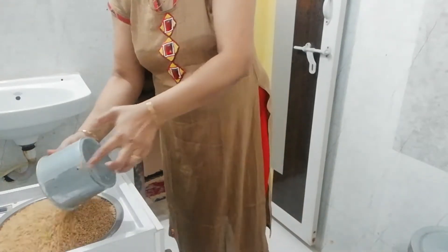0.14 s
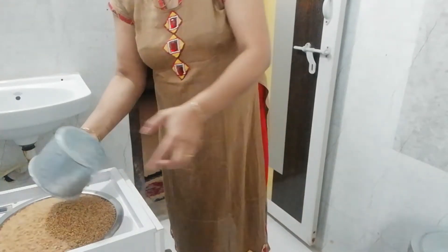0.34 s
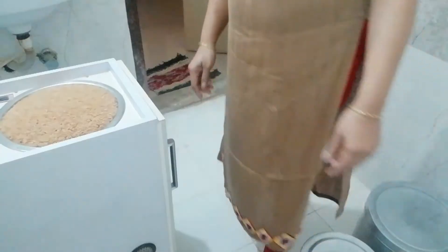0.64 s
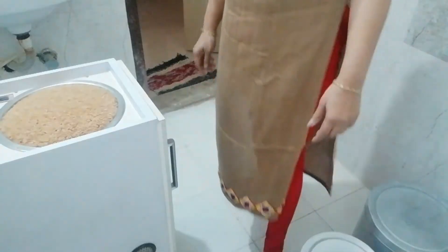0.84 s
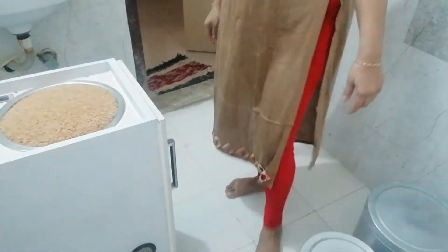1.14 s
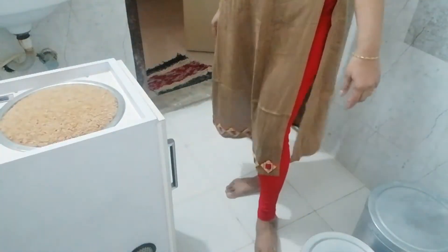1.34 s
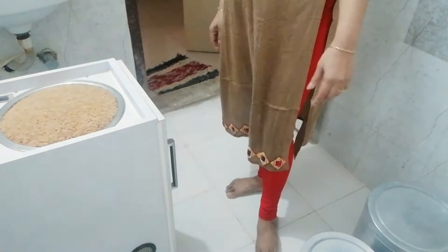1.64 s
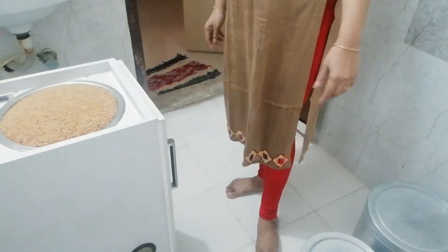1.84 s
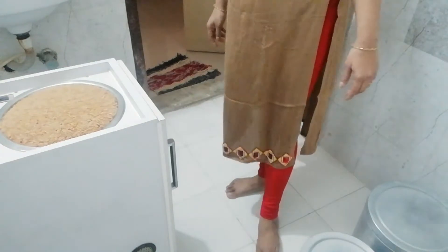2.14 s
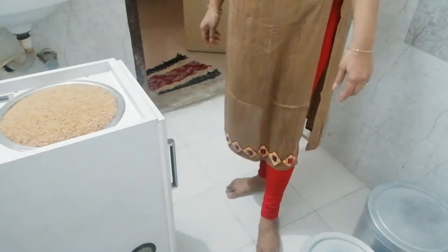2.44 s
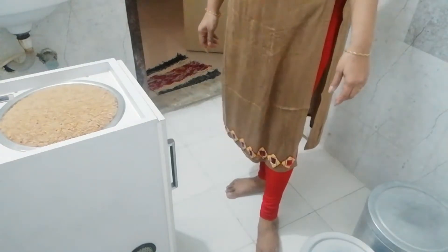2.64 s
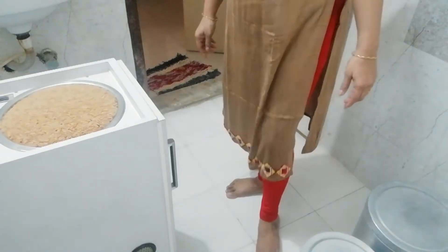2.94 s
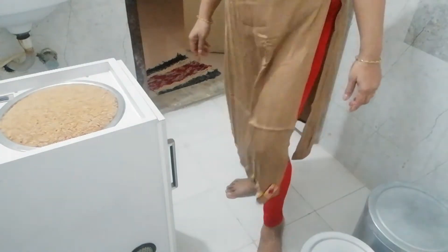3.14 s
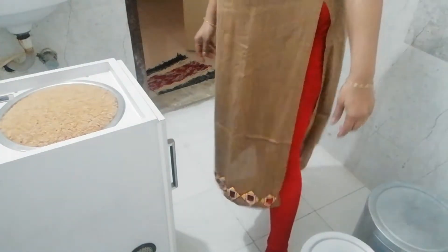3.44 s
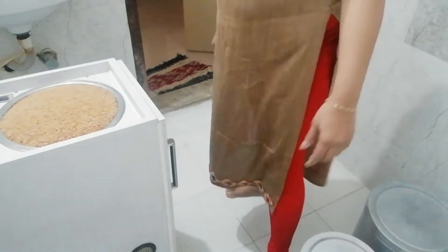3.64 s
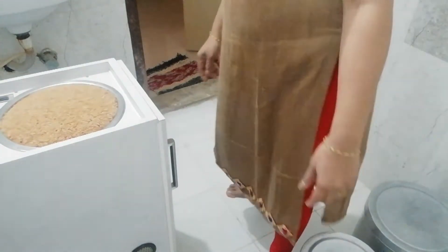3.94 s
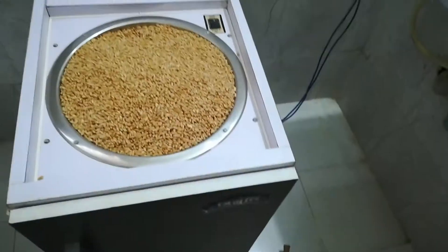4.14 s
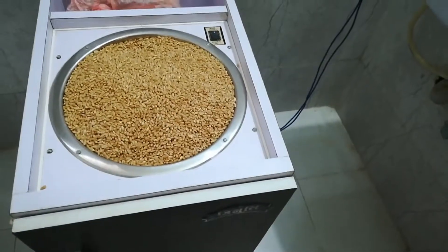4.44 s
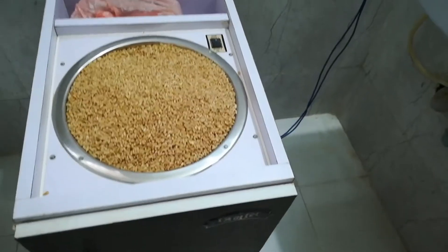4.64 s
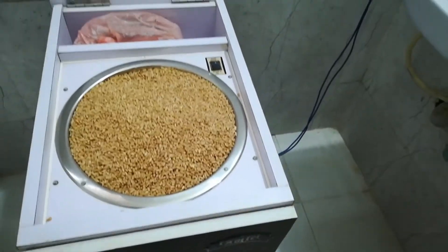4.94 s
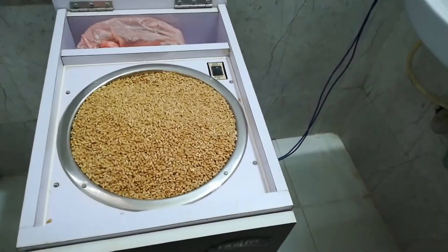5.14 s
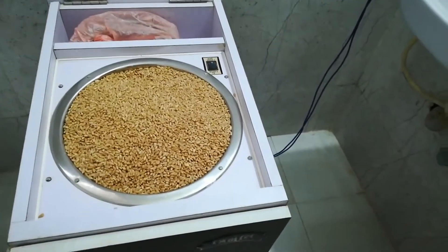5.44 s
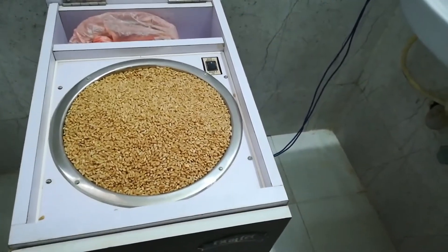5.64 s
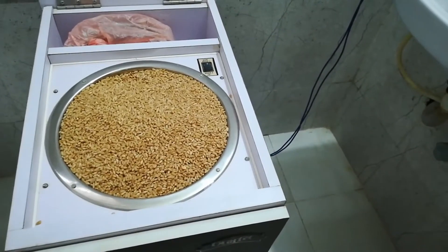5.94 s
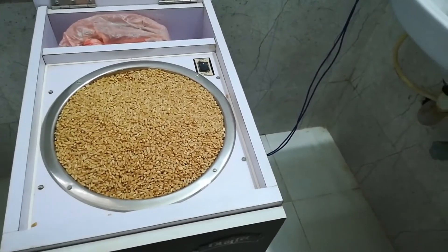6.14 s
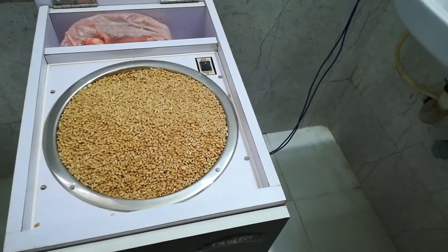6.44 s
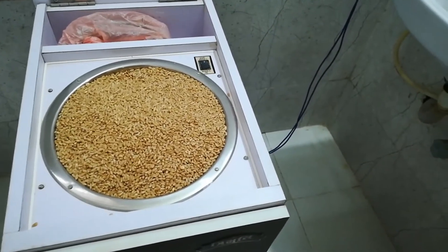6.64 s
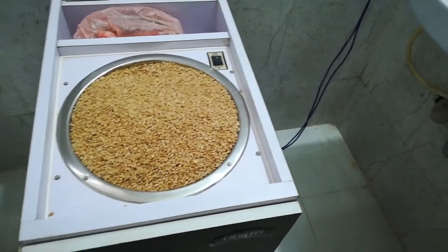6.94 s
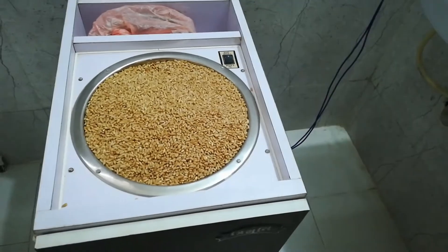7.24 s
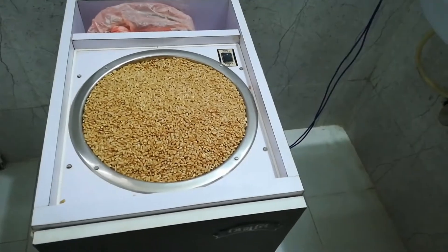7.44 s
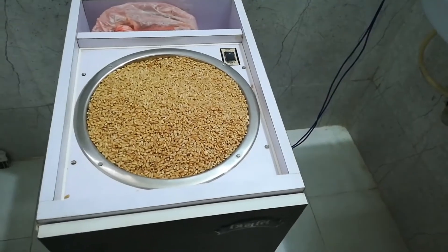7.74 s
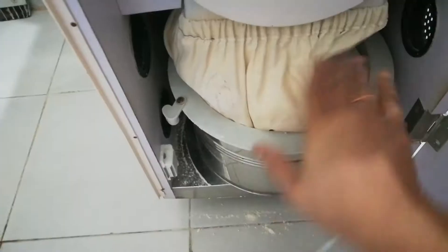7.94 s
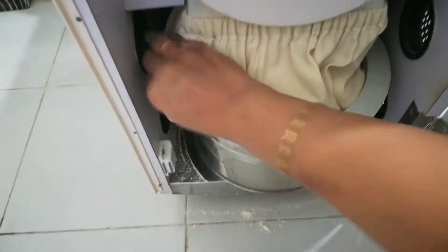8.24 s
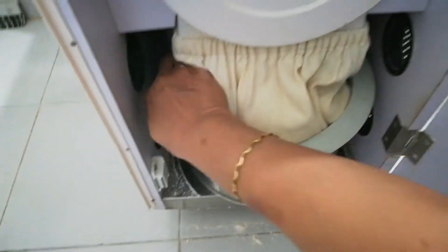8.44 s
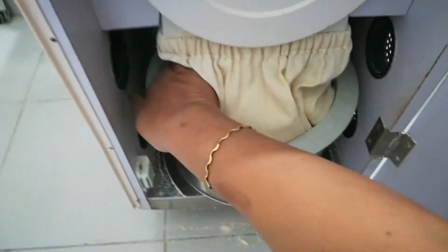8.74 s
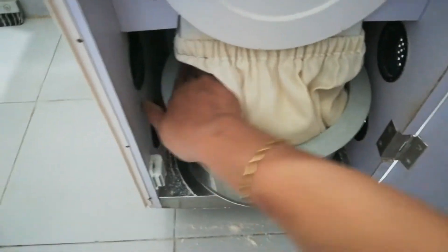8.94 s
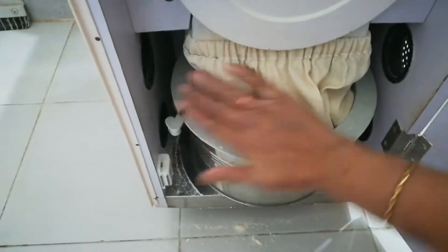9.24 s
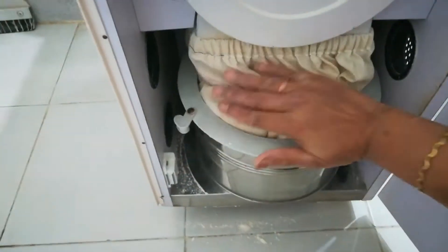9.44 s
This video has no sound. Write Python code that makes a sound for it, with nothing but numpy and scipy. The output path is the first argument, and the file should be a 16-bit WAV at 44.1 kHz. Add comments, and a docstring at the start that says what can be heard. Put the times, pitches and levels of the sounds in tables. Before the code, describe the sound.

Wheat patters briefly into a hopper, then an electric flour mill hums, whines and crackles loudly, cuts off, and cloth rustles amid metal knocks.

```python
"""A small tiled washroom with a home flour mill, in four abruptly joined moments.
The last wheat patters into the hopper as random tiny impacts. The mill runs, heard from the front and then
from above: six beaters hum and the motor whines as wavering tones, grain shatters as clumped impacts.
After a short silence, the motor off, a hand fits the cloth bag on the steel flour bin: strokes of noise
rub and swish, and knocks ring the steel."""
import sys
import numpy as np
from scipy import signal
from scipy.fft import rfft, irfft, next_fast_len
from scipy.io import wavfile

SR = 44100
rng = np.random.default_rng(int(sys.argv[2]) if len(sys.argv) > 2 else 0)


def store_wav(level_fs):
    """Save 16-bit WAV to argv[1]."""
    pcm = np.round(np.clip(np.atleast_2d(level_fs), -1, 1) * 32767)
    wavfile.write(sys.argv[1], SR, pcm.T.astype(np.int16))


N = 422919

MAGNETIC_HZ, BEATER_COUNT, SLOT_COUNT = 100.12, 6, 18  # magnetic pull at twice the mains frequency
ROOM_T60_S = 0.51
AIR_DB = -59


# the running mill from the front, before trim: (time [s], beater hum level [dB], grinding level [dB])
FRONT_RUN = [(0.55, -26.5, -24.5), (1.04, -25, -24), (2.0, -23, -24.5), (2.95, -23, -25), (3.6, -24.5, -25),
             (4.02, -25.6, -24)]
# motor whine from the front, before trim: (time [s], level [dB])
FRONT_WHINE = [(0.6, -38), (1.05, -33.5), (1.6, -36.5), (1.76, -34), (2.05, -32), (2.32, -36.5),
               (2.7, -32.5), (3.3, -34), (4.02, -33.5)]
# beating of the whine: (time of a trough [s], depth [0-1])
FRONT_BEAT = (0.99, 0.11)
# tones: (shaft order, magnetic sideband, level [dB], left-right [dB], unsteadiness [0-1])
FRONT_TONES = [(0, 1, -53, 0, .5), (0, 2, -40, 1, .25), (0, 3, -45, 3, .3), (7, 0, -52, 3, .5),
               (12, 0, -54, -4, .3), (18, -1, -53, 4, .5), (18, 0, -46, 4, .5), (19, 0, -48, 6, .6),
               (20, 1, -47, 9, .5), (24, 0, -39, 12, .4), (35, -1, -45, 8, .6), (36, -1, -46, 4, .7),
               (34.5, 0, -47, 10, .7), (36, 0, -47, 12, .8)]
# cabinet and room resonances: (frequency [Hz], width [Hz], relative level [dB], left-right [dB])
FRONT_CABINET = [(30, 16, -66, -4), (100, 18, -51.5, -1), (116.9, 4, -46, 0.5), (143.4, 5.9, -48.5, 5),
                 (190.4, 32, -44.5, -4), (250, 50, -53.5, 1), (299.6, 25, -43, -1), (487, 22, -50, 21),
                 (860, 52, -41.5, 4), (960, 15, -43, -2.5), (1279, 29, -38, 5.5)]
# shattering grain: (frequency [Hz], relative level [dB per Hz])
FRONT_COLOUR = [(200, -33), (400, -18), (720, -10.5), (1050, -4), (1400, -5), (1700, -3), (2500, -9.5),
                (3200, -8), (5400, -4.5), (6900, 1.5), (7800, -3.5), (9300, -11), (10500, -18.5),
                (12000, -22.5), (15000, -28.5)]
# its stereo balance: (frequency [Hz], left-right [dB])
FRONT_BALANCE = [(300, -8), (600, 3), (1700, 6), (3000, 4.5), (7000, 10), (14000, 5.5)]


def mill_front(t):
    """Before the cabinet the motor is strong and the grain is muffled."""
    turns = shaft(t)
    hum_db, grind_db = in_time(t, FRONT_RUN)
    whine_db, = in_time(t, FRONT_WHINE)
    out = cabinet(t, FRONT_CABINET)
    out += overtones(t, turns, FRONT_TONES, lag_s=-0.000077, waver_rate=5.4)
    out += from_db(hum_db + 2.2) * hum(t, turns, balance_db=.8, flutter=0.037, lead_rad=1.28)
    motor = whine(t, turns, FRONT_BEAT, unsteady=0.14, balance_db=44.5, lead_rad=0.29)
    out += from_db(whine_db + 4.5) * motor
    grain = grinding(t, turns, FRONT_COLOUR, FRONT_BALANCE, lag_s=-.0006,
                     feed_db=1.94, beat_db=1.0, direct_db=-5.5, rush_db=-2.5)
    return out + from_db(grind_db - 0.13) * grain


# the running mill from above, before trim: (time [s], beater hum level [dB], grinding level [dB])
ABOVE_RUN = [(4.06, -26.5, -20.5), (4.16, -28, -20), (4.3, -27, -21.5), (4.8, -26.5, -20),
             (5.75, -25.5, -21.5), (6.7, -26, -21), (6.84, -25, -20), (6.98, -27.5, -22), (7.1, -27, -21),
             (7.85, -26, -20)]
# beating of the whine: (time of a trough [s], depth [0-1])
ABOVE_BEAT = (4.70, 0.74)
# tones: (shaft order, magnetic sideband, level [dB], left-right [dB], unsteadiness [0-1])
ABOVE_TONES = [(5, 0, -48, 1, .5), (5.5, 0, -44.5, 2, .7), (7, 0, -47, -7, .4), (12, 0, -52, -4, .3),
               (18, -1, -55, -7, .5), (20, 1, -51, -5, .6), (25, 1, -47, -2, .5), (22, 0, -52, -4, .5),
               (73, 0, -44, -6, .8)]
# two beater overtones, before the swell: (shaft order, magnetic sideband, level [dB],
# left-right [dB], unsteadiness [0-1])
SWELLING_TONES = [(18, 0, -41, -4, .4), (24, 0, -44, -6, .4)]
# their swell late in the run: (time [s], gain [dB])
SWELL = [(4.1, -4), (6.55, -11), (6.9, 3), (7.85, 1.5)]
# cabinet and room resonances: (frequency [Hz], width [Hz], relative level [dB], left-right [dB])
ABOVE_CABINET = [(27, 14, -73, 1), (76.3, 6, -68, 5), (100, 12, -54.5, 0), (137.8, 5.7, -50.5, 3),
                 (223, 26, -47.5, -3), (314, 26, -42.5, -3), (863, 18, -46.5, -4.5), (940, 14, -44.5, -14),
                 (1140, 49, -44.5, 5.5), (1285, 23, -42.5, -5)]
# shattering grain: (frequency [Hz], relative level [dB per Hz])
ABOVE_COLOUR = [(200, -33.5), (400, -20.5), (720, -20.5), (1050, -15), (1420, -15), (1600, -12),
                (2600, -14), (3500, -10), (5100, -12), (5900, -2), (6900, 1), (8300, -6), (9400, -5.5),
                (10700, -20.5), (13000, -20), (15000, -34)]
# its stereo balance: (frequency [Hz], left-right [dB])
ABOVE_BALANCE = [(300, -6), (600, -4.5), (1300, -4), (2000, -6), (4000, -8), (7000, -17), (14000, -16.5)]
ABOVE_WHINE_DB = -32


def mill_above(t):
    """Over the hopper the hiss of the grain comes straight up."""
    turns = shaft(t)
    hum_db, grind_db = in_time(t, ABOVE_RUN)
    swell_db, = in_time(t, SWELL)
    out = cabinet(t, ABOVE_CABINET)
    out += overtones(t, turns, ABOVE_TONES, lag_s=0.00054, waver_rate=5.5)
    out += from_db(swell_db) * overtones(t, turns, SWELLING_TONES, lag_s=0.00038, waver_rate=4.9)
    out += panel(t, hz=260.2, level_db=-39, unsteady=.5)
    out += bump(t, level_db=-26, t60=0.067)
    out += from_db(hum_db + 0.5) * hum(t, turns, balance_db=-2.0, flutter=0.11, lead_rad=-0.82)
    motor = whine(t, turns, ABOVE_BEAT, unsteady=0.12, balance_db=-5.0, lead_rad=1.76)
    out += from_db(ABOVE_WHINE_DB) * motor
    grain = grinding(t, turns, ABOVE_COLOUR, ABOVE_BALANCE, lag_s=.00059,
                     feed_db=2.0, beat_db=2.5, direct_db=-8.0, rush_db=0.0)
    return out + from_db(grind_db + 0.62) * grain


# beaters passing under load: (time [s], rate [passes per s])
BEATERS = [(0.5, 291.7), (1.2, 290.9), (2.1, 290.7), (3.2, 291.05), (4.05, 291.0), (4.06, 287.9),
           (5.1, 287.5), (6.0, 288.5), (6.4, 288.75), (7.0, 287.75), (7.85, 287.3)]


def shaft(t):
    """Turns made by the shaft that drives hum, whine and grinding."""
    passes_per_s, = in_time(t, BEATERS)
    return np.cumsum(passes_per_s) / BEATER_COUNT / SR


def grinding(t, turns, colour, balance, lag_s, feed_db, beat_db, direct_db, rush_db):
    """Kernels shatter in clumps, hardest as a beater passes, over the rush of swirling flour."""
    clumps_db = feed_db * (0.65 * drift(t, 9.7) + 0.87 * drift(t, 90))
    beaters_db = beat_db * np.cos(2 * np.pi * turns * BEATER_COUNT)
    impacts = grains(t, per_s=9000, spread_db=3.0) * from_db(clumps_db + beaters_db)
    rush = from_db(rush_db) * rng.standard_normal((2, len(t)))
    sound = washroom(impacts, direct_db, lag_s) + rush
    return coloured(sound, colour, 2000, 14000, over_hz(freqs(len(t)), balance))


def hum(t, turns, balance_db, flutter, lead_rad):
    """The beaters pump air six times a turn."""
    return tone(t, BEATER_COUNT * turns, flutter, 12, lead_rad, balance_db)


def whine(t, turns, beat, unsteady, balance_db, lead_rad):
    """The rotor slots pass the magnetic pull of the mains; the whine swells at twice the rotor's slip."""
    trough_s, depth = beat
    slip = MAGNETIC_HZ * t - 2 * turns  # cycles
    since_trough = slip - np.interp(trough_s, t, slip)
    swell = np.abs(1 - depth * np.exp(2j * np.pi * since_trough)) / np.hypot(1, depth)
    cycles = SLOT_COUNT * turns + MAGNETIC_HZ * t
    return swell * tone(t, cycles, unsteady, 8.8, lead_rad, balance_db)


def overtones(t, turns, tones, lag_s, waver_rate):
    """Weaker shaft orders and magnetic sidebands, each swelling and fading."""
    out = 0
    for order, sideband, level_db, balance_db, unsteady in tones:
        cycles = order * turns + sideband * MAGNETIC_HZ * t
        hz = (cycles[1] - cycles[0]) * SR
        lead_rad = -2 * np.pi * hz * lag_s
        out = out + from_db(level_db) * tone(t, cycles, unsteady, waver_rate, lead_rad, balance_db)
    return out


def cabinet(t, modes):
    """Air and tumbling grain shake the panels: noise through their resonances."""
    power = sum((from_db(db) * pan(balance_db) * resonance(t, hz, width)) ** 2
                for hz, width, db, balance_db in modes)
    return shaped(diffuse(t), np.sqrt(power))


def panel(t, hz, level_db, unsteady):
    """A panel drones just under the hum, a slowly wavering tone."""
    return from_db(level_db) * tone(t, hz * t, unsteady, waver_rate=2.5, lead_rad=-.4, balance_db=2)


def bump(t, level_db, t60):
    """A brief low bump of dying noise as the sound jumps to the new place."""
    colour = [(15, -25), (40, -15), (120, -5), (350, -3), (800, -25.5), (3000, -70)]
    fading_db = level_db - 60 * (t - t[0]) / t60
    return from_db(fading_db) * coloured(diffuse(t), colour, 18, 400)


# wheat poured on wheat: (time [s], level [dB])
POUR = [(0.0, -31), (0.21, -34.5), (0.412, -53.5), (0.5, -66)]
# its colour: (frequency [Hz], relative level [dB per Hz])
POUR_COLOUR = [(200, -48), (400, -34), (800, -31), (1500, -27.5), (2400, -26), (3300, -22.5), (4050, -9.5),
               (4550, -9), (5200, -17), (6000, -3), (6600, -4), (8000, -7.5), (10000, -19), (15000, -29)]


def pouring(t):
    """Kernels patter on the heap as tiny impacts and fade out, in the quiet room."""
    level_db, = in_time(t, POUR)
    impacts = washroom(grains(t, per_s=2200, spread_db=3.5), direct_db=-12, lag_s=0.001)
    patter = coloured(impacts, POUR_COLOUR, 1000, 14000, balance_db=3.0)
    return from_db(level_db) * patter + air(t, level_db=AIR_DB)


def bag(t):
    """The bag is fitted on the bin: cloth, pushes, singing rim and knocks in the quiet room."""
    return cloth(t) + pushes(t) + rim(t) + knocks(t) + air(t, level_db=AIR_DB - 8.0)


# knocks on the bin: (time [s], thud level [dB], clank level [dB], tick level [dB])
KNOCKS = [(7.953, -58, -72, -52), (8.036, -48.5, -73, -60), (8.068, -57, -77, -53), (8.288, -68, -65, -57),
          (8.410, -50, -61, -53), (8.483, -46, -63, -56), (8.511, -39.5, -43, -37.5),
          (8.535, -41.5, -45.5, -58), (8.664, -55, -51.5, -54), (8.772, -44, -60, -62),
          (8.814, -63, -75, -55), (8.989, -58, -74, -36.5), (9.167, -50, -68, -36.5),
          (9.392, -41, -68, -39), (9.427, -58, -75, -45)]
# low ringing of bin and cabinet: (frequency [Hz], width [Hz], relative level [dB])
THUD_MODES = [(170, 23, -2), (218, 25, -1), (290, 100, -5.5)]
# ringing of the steel: (frequency [Hz], width [Hz], relative level [dB])
CLANK_MODES = [(563, 45, -1.5), (650, 64, -1), (940, 110, -3), (1351, 100, -13), (1600, 90, -5),
               (1860, 120, -2)]


def knocks(t):
    """The bin thuds against the cabinet, its steel clanks, the clamp ticks."""
    _, thud_db, clank_db, tick_db = np.transpose(KNOCKS)
    thud = blows(t, thud_db, t60=0.42, rise_s=0.0019) * ringing(t, THUD_MODES)
    clank = blows(t, clank_db, t60=0.36, rise_s=0.0019) * ringing(t, CLANK_MODES)
    crack_colour = [(300, -11), (1400, 3), (2800, 0.5), (5000, 5), (7500, 3.5), (15000, -43)]
    crack = coloured(diffuse(t), crack_colour, 300, 15000, balance_db=-3)
    tick = blows(t, tick_db, t60=0.019, rise_s=.0005)
    tick_tail = blows(t, tick_db - 16.0, t60=ROOM_T60_S, rise_s=.004)
    return thud + clank + (tick + tick_tail) * crack


def blows(t, levels_db, t60, rise_s):
    """The envelope of all knocks: each rises quickly and dies away."""
    age = np.maximum(t - np.array(KNOCKS)[:, :1], 0).astype(np.float32)
    each = np.exp(-np.log(1000) * age / t60) * (1 - np.exp(-age / rise_s))
    return np.sqrt(from_db(2 * levels_db) @ each ** 2)


# strokes over the cloth bag: (time [s], length [s], swish level before trim [dB], rub level [dB])
STROKES = [(7.948, .05, -49.5, -63), (7.997, 0.056, -46, -61), (8.29, 0.13, -64, -70),
           (8.392, 0.12, -54, -63), (8.495, 0.059, -48, -57), (8.60, .16, -57, -61.5),
           (8.79, 0.1, -62, -67), (8.883, .07, -57, -66), (8.993, 0.18, -54, -63), (9.167, 0.066, -45, -62),
           (9.283, 0.04, -56, -66), (9.373, 0.066, -46, -55.5), (9.464, .035, -52.5, -59.5),
           (9.528, .02, -53, -65)]
# catching fibres: (frequency [Hz], relative level [dB per Hz])
SWISH_COLOUR = [(1250, -31.8), (2500, -8), (4500, -5), (5700, -5), (7000, 2.5), (9000, -11.1),
                (11000, -20.1), (15000, -27)]
# rubbing on the bin: (frequency [Hz], relative level [dB per Hz])
RUB_COLOUR = [(120, -27), (250, 5), (400, 0.5), (600, -12.5), (1100, -2), (1600, -1.5), (2400, -7),
              (4000, -23)]
STROKE_ATTACK_S, STROKE_RELEASE_DB_PER_S = 0.017, 220


def cloth(t):
    """Fibres catch and slip as tiny impacts, and the bag rubs the rim as smooth noise."""
    start_s, length_s, swish_db, rub_db = np.transpose(STROKES)
    swishing, rubbing = (strokes(t, start_s, length_s, db, STROKE_ATTACK_S, STROKE_RELEASE_DB_PER_S)
                         for db in (swish_db, rub_db))
    fibres = washroom(grains(t, per_s=3500, spread_db=7.5), direct_db=-11, lag_s=.0006)
    swish = swishing * from_db(-1.0) * coloured(fibres, SWISH_COLOUR, 3000, 14000, balance_db=-6)
    rub = rubbing * coloured(diffuse(t), RUB_COLOUR, 900, 2500, balance_db=-0.5)
    return swish + rub


# the steel rim under the sliding hand: (time [s], level [dB])
RIM = [(8.27, -94), (8.29, -62), (8.40, -65), (8.52, -54), (8.62, -67), (8.67, -64), (8.80, -78),
       (8.9, -95)]
# its modes: (frequency [Hz], width [Hz], relative level [dB])
RIM_MODES = [(1500, 60, 0), (1640, 70, -0.5), (1800, 70, -7)]


def rim(t):
    """The steel rim sings under the sliding hand."""
    level_db, = in_time(t, RIM)
    return from_db(level_db) * ringing(t, RIM_MODES)


# pushes that set the cabinet booming: (time [s], length [s], level [dB])
PUSHES = [(7.953, .09, -55), (8.51, 0.18, -54), (8.74, .11, -62), (9.357, .08, -50)]
# low handling rumble: (time [s], level [dB])
RUMBLE = [(7.96, -62), (8.1, -73), (8.3, -65), (8.75, -65), (8.88, -74), (9.0, -61), (9.2, -67),
          (9.33, -54), (9.4, -51), (9.58, -55)]
# its colour: (frequency [Hz], relative level [dB per Hz])
RUMBLE_COLOUR = [(10, -5), (25, 3), (50, -3), (110, -11), (200, -33), (600, -80)]
BOOM_HZ, PUSH_ATTACK_S, PUSH_RELEASE_DB_PER_S = 74.5, 0.019, 110


def pushes(t):
    """The cabinet booms on one wavering tone and rumbles as it is pushed."""
    pushing = strokes(t, *np.transpose(PUSHES), PUSH_ATTACK_S, PUSH_RELEASE_DB_PER_S)
    boom = pushing * tone(t, BOOM_HZ * t, unsteady=0.28, waver_rate=12, lead_rad=0, balance_db=1)
    rumble_db, = in_time(t, RUMBLE)
    return boom + from_db(rumble_db) * coloured(diffuse(t), RUMBLE_COLOUR, 18, 53)


def strokes(t, start_s, length_s, levels_db, attack_s, release_db_per_s):
    """The envelope of sustained gestures: each rises, holds for its length and fades."""
    age = t - start_s[:, None]
    overtime = np.maximum(age - length_s[:, None], 0)
    fading_db = levels_db[:, None] - release_db_per_s * overtime
    each = np.clip(age / attack_s, 0, 1) * from_db(fading_db)
    return each.max(0)


# the quiet room: (frequency [Hz], relative level [dB per Hz])
AIR_COLOUR = [(15, -32), (25, -7), (163, -8), (501, -22), (2070, -16), (3730, -14.5), (5280, -15),
              (6540, -15), (7480, -17), (15000, -37)]


def air(t, level_db):
    """The quiet room, a steady coloured noise."""
    return from_db(level_db) * coloured(diffuse(t), AIR_COLOUR, 33, 15000)


def washroom(x, direct_db, lag_s):
    """Direct sound, later at the left by lag, plus the dense tail of the tiles."""
    age = np.arange(SR // 2) / SR
    tail = from_db(-60 * age / ROOM_T60_S) * (age > .002)
    response = rng.standard_normal((2, len(age))) * tail
    response /= np.sqrt(np.sum(response ** 2, axis=1, keepdims=True))
    for ear, late_s in enumerate((max(lag_s, 0), max(-lag_s, 0))):
        response[ear, round(late_s * SR)] += from_db(direct_db)
    return rms_one(shaped(x, rfft(response, len(x))))


def grains(t, per_s, spread_db):
    """Random tiny impacts, a few much harder than the rest."""
    hardness = from_db(spread_db * np.minimum(rng.exponential(1, len(t)), 4))
    return (rng.random(len(t)) < per_s / SR) * hardness * rng.choice([-1, 1], len(t))


def tone(t, cycles, unsteady, waver_rate, lead_rad, balance_db):
    """A line of rms 1 that wavers in strength and phase; the left side leads."""
    share = np.clip(unsteady, 0, 1)
    lead = np.array([[lead_rad], [0]])
    phase = (2 * np.pi * ((cycles + rng.random()) % 1) + lead).astype(np.float32)
    steady = np.sqrt(2 - 2 * share ** 2)
    in_phase = (steady + share * drift(t, waver_rate)) * np.sin(phase)
    quadrature = share * drift(t, waver_rate) * np.cos(phase)
    return pan(balance_db) * (in_phase + quadrature)


def ringing(t, modes):
    """Clusters of close modes; rms 1."""
    power = sum((from_db(db) * resonance(t, hz, width)) ** 2 for hz, width, db in modes)
    return rms_one(shaped(diffuse(t), np.sqrt(power)))


def resonance(t, hz, width_hz):
    """A steep-sided peak that passes unit power of white noise."""
    f = freqs(len(t))
    return rms_one(f / (f + hz) / (1 + ((f - hz) / width_hz) ** 2))


def diffuse(t, alike_below_hz=430):
    """Room noise: nearly the same at both ears in the bass, unrelated in the treble."""
    mid, side = rng.standard_normal((2, len(t)))
    alike = .97 / (1 + (freqs(len(t)) / alike_below_hz) ** 3)
    return shaped(mid, np.sqrt(1 + alike)) + shaped(side, np.sqrt(1 - alike)) * [[1], [-1]]


def coloured(x, colour, lo_hz, hi_hz, balance_db=0):
    """Give a stereo sound its colour; the centre has rms 1 between lo and hi."""
    hz = freqs(x.shape[1])
    spectrum = rfft(x) * from_db(over_hz(hz, colour)) * pan(balance_db)
    centre = spectrum.mean(0)[(hz > lo_hz) & (hz < hi_hz)]
    return irfft(spectrum) * x.shape[1] / np.sqrt(2 * np.sum(np.abs(centre) ** 2))


def shaped(x, gain):
    """Filter by a gain per frequency."""
    return irfft(rfft(x) * gain)


def drift(t, rate):
    """Slow chance of spread 1; rate is the corner in Hz."""
    r = np.exp(-80 * np.pi * rate / SR)  # one step every 40 samples
    steps = rng.standard_normal(len(t) // 40 + 2002)
    slow = signal.lfilter([1], [1, -2 * r, r * r], steps)[2000:]  # skip the settling
    return np.interp(np.arange(len(t)) / 40, np.arange(len(slow)), rms_one(slow))


def pan(db):
    """Left and right gains of constant power."""
    pair = from_db(np.array([[.5], [-.5]]) * db)
    return pair / np.sqrt(np.mean(pair ** 2, axis=0))


def from_db(db):
    """Decibels to gain."""
    return 10 ** (np.asarray(db) / 20)


def rms_one(x):
    """Scale to unit rms."""
    return x / np.sqrt(np.mean(x ** 2) + 1e-20)


def in_time(t, rows):
    """Each column of a curve at the times t."""
    s, *columns = np.transpose(rows)
    return [np.interp(t, s, c) for c in columns]


def over_hz(hz, points):
    """A spectrum table at the frequencies hz."""
    at, value = np.transpose(points)
    return np.interp(np.log(hz), np.log(at), value)


def freqs(count):
    """The frequencies of a sound of this many samples, none below 1 Hz."""
    return np.maximum(np.arange(count // 2 + 1) * SR / count, 1)


def moment(start, end):
    """Sample times that cover a span, padded to a fast even length."""
    half = next_fast_len(round((end - start) * SR / 2) + 1, real=True)
    return start + np.arange(half * 2) / SR


POUR_END_S, MOVE_S, MILL_END_S, BAG_START_S = .5135, 4.055, 7.854, 7.952


def scene():
    """Pouring, milling from two places, a short silence, then the bag."""
    out = np.zeros((2, N))
    for source, start, end in [(pouring, 0, POUR_END_S), (mill_front, POUR_END_S, MOVE_S),
                               (mill_above, MOVE_S, MILL_END_S), (bag, BAG_START_S, N / SR)]:
        first, last = round(start * SR), round(end * SR)
        out[:, first:last] = source(moment(start, end))[:, :last - first]
    return out


CUTOFF_HZ = 15300


def record(dry):
    """The highest peaks are rounded and the top is cut steeply."""
    rounded = dry / (1 + (dry / .8) ** 8) ** (1 / 8)
    low_pass = signal.ellip(10, .1, 80, CUTOFF_HZ, fs=SR, output="sos")
    return signal.sosfilt(low_pass, rounded)


dry = scene()
out = record(dry)
store_wav(out)
```